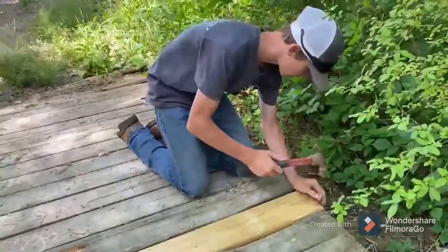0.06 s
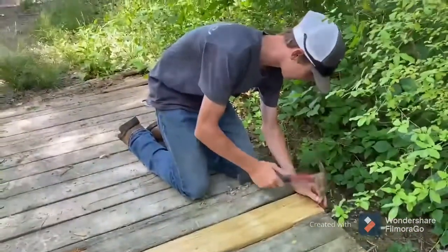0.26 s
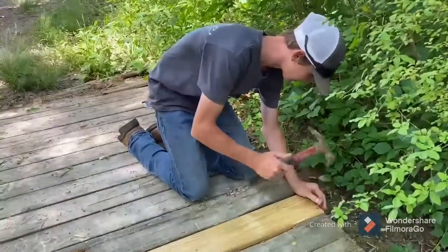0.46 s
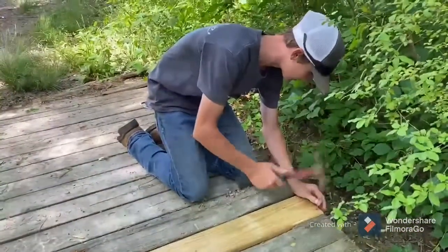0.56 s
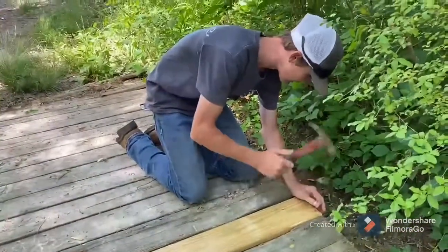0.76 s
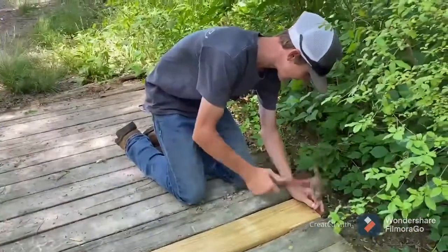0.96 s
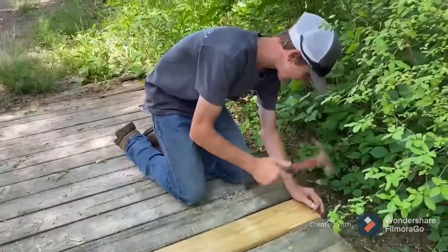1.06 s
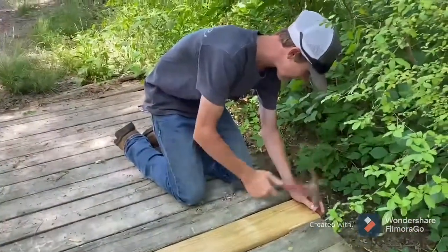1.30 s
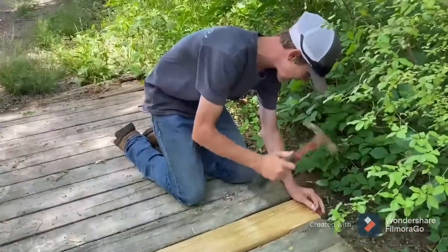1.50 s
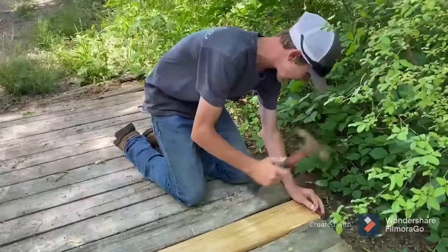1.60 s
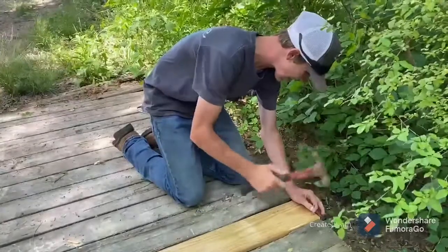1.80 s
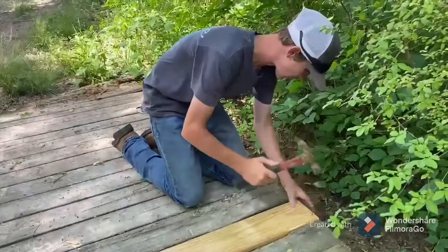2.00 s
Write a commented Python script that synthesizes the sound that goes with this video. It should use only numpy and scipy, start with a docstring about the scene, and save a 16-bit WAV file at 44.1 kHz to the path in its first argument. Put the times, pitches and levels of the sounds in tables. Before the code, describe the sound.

A hammer drives a nail into a loose wooden deck board: a duller, thumpier blow at 0.22 s, then sharp cracking blows at about 0.57, 0.92, 1.28 and 1.65 s. Around and after each, the board bounces on its joists with dull double knocks and low booms, fading by 2 s. Close outdoor stereo sound, slightly overloaded peaks, short scatter from planks and trees, faint leaf hiss and low gusty wind.

```python
"""Five sharp hammer blows on a nail in a loose deck board, with dull knocks around them, outdoors among trees.
Each blow is a noise crack plus hammer-head modes through the air, and a thump and board modes along the wood
as a bending wave (treble first, bass late). The knocks are the board bouncing on its joists: push, ring, tick, boom.
Decaying noise answers from planks and trees; filtered noise makes the low wind rumble and leaf hiss beneath."""
import sys
import numpy as np
from scipy import signal
from scipy.fft import rfft, irfft, next_fast_len
from scipy.io import wavfile
from scipy.ndimage import uniform_filter1d, map_coordinates

SR = 44100
rng = np.random.default_rng(int(sys.argv[2]) if len(sys.argv) > 2 else 0)


def persist_wave(psi):
    """Save psi, clipped to +-1, as 16-bit WAV."""
    counts = np.round(np.clip(psi, -1, 1) * 32767).astype(np.int16)
    wavfile.write(sys.argv[1], SR, np.atleast_2d(counts).T)


N = 90404
EVENT_SAMPLES = 2 ** 14
FREQ_HZ = np.fft.rfftfreq(EVENT_SAMPLES, 1 / SR)
TIME_S = np.arange(EVENT_SAMPLES) / SR

# Leaf hiss spectrum. Each row: frequency in Hz, relative level in dB per Hz.
LEAF_SPECTRUM = [(120, -33), (200, -1.5), (715, -2.5), (2000, -8.5), (4880, -17), (8000, -24),
                 (11000, -27.5), (14500, -34), (16500, -34.5)]
# Wind rumble spectrum. Each row: frequency in Hz, relative level in dB per Hz.
RUMBLE_SPECTRUM = [(20, -28.5), (46, -15.5), (64, -13), (92, -13), (300, -36), (390, -107), (660, -120)]
# Mean course of the rumble level. Each row: time in seconds, level in dB.
GUST_LEVELS = [(0, -31), (.2, -30.5), (.3, -19.5), (.45, -38), (.55, -28.5), (.7, -27.5), (.83, -28),
               (.9, -29.5), (1.05, -33), (1.2, -28.5), (1.35, -26.5), (1.45, -31.5), (1.6, -28),
               (1.75, -34), (1.9, -30), (2.05, -35.5)]
# Left-right likeness of the air noise. Each row: frequency in Hz, correlation from -1 to 1.
AIR_CORRELATION = [(60, 0.91), (180, 0.9), (550, 0.14), (1650, -0.16), (4970, 0.72), (15000, 0.051)]
# Decay of the answer from planks and trees. Each row: frequency in Hz, t60 in seconds.
ANSWER_DECAY = [(300, 0.38), (1000, 0.14), (3000, 0.07), (7000, 0.039), (15000, 0.043)]

# Board landing on its joists. Each row: time in seconds, knock in dB, tick in dB, boom in dB, boom pitch in Hz.
LANDINGS = [(.086, -39.5, -72, -41, 114), (0.274, -21, -28.5, -20.5, 122), (0.321, -26.5, -38, -18, 106.2),
            (.375, -35.5, -55, -21, 87.3), (0.6418, -13, -24.5, -17.5, 122),
            (0.698, -15.5, -32.5, -17.5, 111.7), (.747, -52, -42, -28, 107),
            (1.012, -14.5, -26.5, -23, 122.4), (1.082, -16.5, -36, -23, 126.4),
            (1.145, -25, -51, -17.5, 113.2), (1.191, -29, -62, -31, 118), (1.373, -15.5, -26, -26, 123),
            (1.445, -26, -65, -17.5, 120), (1.508, -25, -43, -16.5, 113.7), (1.59, -39, -59, -31.5, 119),
            (1.749, -18.5, -25.5, -22, 115), (1.826, -34.5, -58, -25.5, 113.4),
            (1.876, -26.5, -43.5, -23, 120), (1.927, -42, -60, -35, 115)]
# Landing push spectrum. Each row: frequency in Hz, relative level in dB per Hz.
PUSH_SPECTRUM = [(60, -31), (130, -38), (200, 7.5), (280, 11.5), (420, -2.5), (700, -22), (2000, -31),
                 (5000, -120)]
# Landing tick spectrum. Each row: frequency in Hz, relative level in dB per Hz.
TICK_SPECTRUM = [(200, -27), (400, 17), (1200, 10.5), (3000, -0.5), (5500, -16.5), (7000, -25),
                 (10000, -120)]
# Joist modes. Each row: nominal frequency in Hz, mean level in dB, t60 in seconds.
JOIST_MODES = [(215.8, -8, 0.19), (248.5, -3.5, 0.095), (334, -8, 0.084), (434.5, -9, 0.089),
               (772.5, -17, 0.15)]

# Hammer blows. Each row: time in seconds, thump in dB, bass in dB, ring in dB, contact hardness in Hz,
# crack in dB, crack brightness in dB per octave, steel in dB.
HAMMER_BLOWS = [(0.2211, -2.5, -7, -4.5, 476, -17, 4.5, -35.5),
                (0.5695, -7.5, -6.5, -4.5, 794, -4, 2, -24.5),
                (0.9239, -11.5, -10.5, -6.5, 1630, -8, 3, -30.5),
                (1.2796, -7.5, -15, -8.5, 1650, -5, 2, -53), (1.653, -8.5, -22.5, -9, 1610, -4.5, 2, -26)]
# Thump spectrum. Each row: frequency in Hz, relative level in dB per Hz.
THUMP_SPECTRUM = [(30, -33), (60, -51), (90, 2.5), (130, 11), (250, 0), (350, -2.5), (600, -3.5),
                  (1200, -21.5), (3000, -56.5), (9000, -120)]
# Crack spectrum before brightness. Each row: frequency in Hz, relative level in dB per Hz.
CRACK_SPECTRUM = [(150, -29), (400, 14), (1000, 10.5), (3000, 3.5), (6000, -6), (10000, -15),
                  (16000, -24.5)]
# Deck frame modes. Each row: frequency in Hz, mean level in dB, t60 in seconds.
FRAME_MODES = [(90, -37, 0.025), (121, -4.5, 0.21)]
# Board modes. Each row: frequency in Hz, mean level in dB, t60 in seconds.
BOARD_MODES = [(264, -7, 0.11), (345, -10, 0.06), (428, -7, 0.06), (480, -11, 0.1), (585, -3, 0.075),
               (676, -13, .1), (775, -3, .14), (930, -13, 0.08), (1012, -10, 0.04), (1240, -9, 0.04),
               (1450, -14, 0.035), (1884, -16, 0.05), (2090, -9, .03), (4110, -16, 0.03)]
# Hammer head modes. Each row: frequency in Hz, mean level in dB, t60 in seconds.
STEEL_MODES = [(5771, 0, .085), (5900, -8, .05)]

# Phase lead of the left at width 1. Each row: frequency in Hz, lead in radians.
LEFT_LEAD = [(270, 0.15), (380, 0.4), (550, -2), (1000, 0.8), (1500, 2.5), (1850, 1.42), (2200, -2.34),
             (2800, -1.6), (4500, -0.4), (6500, 1.75), (7500, -1.5), (10500, 1.5), (11500, -2),
             (14500, 0.5), (15500, 4.5)]
# Left over right at width 1. Each row: frequency in Hz, level difference in dB.
LEFT_TILT = [(270, 6), (380, 7.5), (520, -1), (1000, -6.5), (2200, 1.5), (4500, -3), (6500, 10.5),
             (7500, 0.5), (11000, 0.5)]
# Bands where the centre cancels. Each row: centre in Hz, half width in Hz, depth in dB.
CENTRE_DIPS = [(9015, 842, -18.5), (12860, 750, -24)]
# Bands where both sides hear alike. Each row: centre in Hz, half width in Hz, depth in dB.
SIDE_DIPS = [(6900, 450, -18), (15700, 230, -31)]

# Bending delay in seconds = spread / sqrt(Hz)
BLOW_SPREAD, LANDING_SPREAD = 0.106, 0.14
BURST_RISE_S, TICK_T60_S = 0.00051, 0.044
CRACK_T60_S, SNAP_T60_S, SNAP_HZ, SNAP_DB = 0.036, 0.016, 3560, 7
BOOM_PEAK_S = 0.022
JOIST_RING_DB, SECOND_TOUCH_DB = -4.5, -6
MODE_LEVEL_SD_DB = 2
LANDING_SD = 0.1  # log spread of push pitch and bending spread
LEAF_DB, ANSWER_DB = -45.5, -5
ANSWER_LOW_HZ, MONO_HZ = 800, 230
BLOW_WIDTH, LANDING_WIDTH = 0.77, 0.5  # share of lead and tilt
ROLL_OFF_HZ, TOP_HZ = 45, 16950
CLIP_LEVEL, CLIP_HARDNESS = 1, 4


def amp(db):
    """Gain from dB."""
    return 10 ** (np.asarray(db) / 20)


def unit(x):
    """Scale to rms 1."""
    return x / np.sqrt(np.mean(x ** 2) + 1e-20)


def peak(x):
    """Scale to peak 1."""
    return x / np.abs(x).max()


def along(points, hz):
    """Interpolate (Hz, value) points on a log-frequency axis."""
    point_hz, value = np.transpose(points)
    return np.interp(np.log(hz + 1), np.log(point_hz + 1), value)


def wobble(knots_per_s):
    """Smooth random curve."""
    knots = rng.standard_normal(int(N * knots_per_s / SR) + 4)
    return map_coordinates(knots, [np.arange(N) * knots_per_s / SR])


def filtered(x, response):
    """Filter by a complex response of frequency, zero-padded."""
    size = next_fast_len(x.shape[-1] + SR // 4)
    spectrum = rfft(x, size) * response(np.fft.rfftfreq(size, 1 / SR))
    return irfft(spectrum, size)[..., :x.shape[-1]]


def add(track, start_s, sound):
    """Mix in a sound at its start time."""
    track[round(start_s * SR):][:EVENT_SAMPLES] += sound


def ring(modes):
    """Sum of decaying sine modes, levels drawn anew."""
    out = np.zeros(EVENT_SAMPLES)
    for hz, db, t60_s in modes:
        level_db = db + MODE_LEVEL_SD_DB * rng.normal()
        out += amp(level_db - 60 * TIME_S / t60_s) * np.sin(2 * np.pi * hz * TIME_S)
    return out


def travel(spectrum, spread):
    """Bending wave in wood: delay falls as 1 / sqrt(Hz), so treble arrives first."""
    wave = irfft(spectrum * np.exp(-4j * np.pi * spread * np.sqrt(FREQ_HZ)), EVENT_SAMPLES)
    fade_in = np.clip(TIME_S / 0.0017, 0, 1) ** 2
    return wave * fade_in * (TIME_S < TIME_S[-1] * 0.75)


def burst(spectrum, t60_s, tilt_db=0):
    """Dying coloured noise; tilt in dB per octave about 2 kHz."""
    colour_db = along(spectrum, FREQ_HZ) + tilt_db * np.log2((FREQ_HZ + 1) / 2000)
    noise = irfft(rfft(rng.standard_normal(EVENT_SAMPLES)) * amp(colour_db), EVENT_SAMPLES)
    return unit(noise) * amp(-60 * TIME_S / t60_s) * (1 - np.exp(-TIME_S / BURST_RISE_S))


def rush(spectrum, patchy_db):
    """Partly correlated stereo noise of rms 1, with random gain patches in time and frequency."""
    z = signal.stft(rng.standard_normal((2, N)), nperseg=512)[2]
    patches = uniform_filter1d(rng.standard_normal(z.shape[1:]), 6, 0)  # across frequency
    patches = uniform_filter1d(patches, 14, 1)  # across time
    pair = signal.istft(z * amp(patchy_db * unit(patches)), nperseg=512)[1][:, :N]

    def mid_side_gain(hz):
        angle = np.arccos(np.clip(along(AIR_CORRELATION, hz), -1, 1)) / 2
        return amp(along(spectrum, hz)) * [np.cos(angle), np.sin(angle)]

    mid, side = filtered(pair, mid_side_gain)
    return unit(np.array([mid + side, mid - side]))


def air():
    """Leaf hiss and gusty wind rumble: patchy noise under slow level curves."""
    gust_s, gust_db = np.transpose(GUST_LEVELS)
    rumble_db = np.interp(np.arange(N) / SR, gust_s, gust_db) + 0.62 * wobble(11.8)
    leaf_db = LEAF_DB + 0.12 * wobble(4.6)
    leaves = amp(leaf_db) * rush(LEAF_SPECTRUM, patchy_db=-1.5)
    return leaves + amp(rumble_db) * rush(RUMBLE_SPECTRUM, patchy_db=4.5)


def scatter(x):
    """Planks and trees answer with noise whose decay depends on frequency, redrawn for each blow."""
    out = np.zeros((2, N))
    # each span opens 10 ms before its blow; the first opens at zero
    starts_s = [0] + [row[0] - 0.01 for row in HAMMER_BLOWS[1:]]
    edges = np.round(np.array(starts_s + [N / SR]) * SR)
    for start, end in zip(edges, edges[1:]):
        hz, t, z = signal.stft(rng.standard_normal((2, SR // 4)), SR, nperseg=256)
        low_cut = hz ** 3 / (hz ** 3 + ANSWER_LOW_HZ ** 3)
        decay = amp(-60 * t / along(ANSWER_DECAY, hz)[:, None])
        tail = signal.istft(z * decay * low_cut[:, None], SR, nperseg=256)[1]
        part = x * (np.arange(N) >= start) * (np.arange(N) < end)
        out += signal.fftconvolve(part[None], tail / np.linalg.norm(tail[0]), axes=1)[:, :N]
    return out


def boom(hz):
    """Deck frame swells and fades with gliding pitch; a lower neighbouring mode beats against it."""
    u = TIME_S / BOOM_PEAK_S
    glide = 1 + 0.04 * rng.normal() * u
    pitch_ratio, turn = rng.uniform(0.7, 0.85), rng.uniform(0, 2 * np.pi)
    phase = 2 * np.pi * hz * np.cumsum(glide) / SR
    swell = (u * np.exp(1 - u)) ** 2
    return swell * (np.sin(phase) + 0.28 * np.sin(pitch_ratio * phase + turn))


def touch():
    """Wood on wood: soft push and dull joist ring, pitch and spread drawn anew."""
    pitch, spread = np.exp(LANDING_SD * rng.normal(size=2))
    push = peak(travel(amp(along(PUSH_SPECTRUM, FREQ_HZ / pitch)), LANDING_SPREAD * spread))
    modes = []
    for hz, db, t60_s in JOIST_MODES:
        detune = np.exp(LANDING_SD / 2 * rng.normal() * (hz < 500))  # low modes only
        modes.append((hz * detune, db, t60_s))
    return push + amp(JOIST_RING_DB) * travel(rfft(ring(modes)), LANDING_SPREAD)


def bounces():
    """Board lands on its joists: two touches, the second weaker, with a tick and the boom."""
    out = np.zeros(N + 2 * EVENT_SAMPLES)
    for start_s, knock_db, tick_db, boom_db, boom_hz in LANDINGS:
        second_s = rng.uniform(0.00605, 0.0121)
        add(out, start_s, amp(knock_db) * touch())
        add(out, start_s + second_s, amp(knock_db + SECOND_TOUCH_DB) * touch())
        tick = amp(tick_db) * burst(TICK_SPECTRUM, TICK_T60_S)
        add(out, start_s, amp(boom_db) * boom(boom_hz) + tick)
    return out[:N]


def crack(tilt_db):
    """Steel on steel: two noise bursts crossed over at SNAP_HZ, the top dying first."""
    high = 1 / (1 + (SNAP_HZ / (FREQ_HZ + 1)) ** 4)
    snap = rfft(burst(CRACK_SPECTRUM, SNAP_T60_S, tilt_db))
    body = rfft(burst(CRACK_SPECTRUM, CRACK_T60_S, tilt_db))
    return irfft(snap * high * amp(SNAP_DB) + body * (1 - high), EVENT_SAMPLES)


def softened(x, hardness_hz):
    """Spectrum of a ring set off by a contact that is soft above hardness_hz."""
    return rfft(x) / (1 + 1j * FREQ_HZ / hardness_hz) ** 2


def hammer():
    """Crack and steel come through the air; thump and ring run along the board."""
    out = np.zeros(N + EVENT_SAMPLES)
    thump = peak(travel(amp(along(THUMP_SPECTRUM, FREQ_HZ)), BLOW_SPREAD))
    for start_s, thump_db, bass_db, ring_db, hardness_hz, crack_db, bright_db, steel_db in HAMMER_BLOWS:
        frame = amp(bass_db) * rfft(ring(FRAME_MODES))
        board = amp(ring_db) * softened(ring(BOARD_MODES), hardness_hz)
        wood = amp(thump_db) * thump + travel(frame + board, BLOW_SPREAD)
        steel = amp(crack_db) * crack(bright_db) + amp(steel_db) * ring(STEEL_MODES)
        add(out, start_s, steel - wood)  # wood has opposite polarity
    return out[:N]


def placed(x, width):
    """Stereo by frequency-dependent phase lead and level tilt; bass alike in both channels."""
    def response(hz):
        share = width * np.array([[0.5], [-0.5]]) * hz ** 6 / (hz ** 6 + MONO_HZ ** 6)
        return amp(share * along(LEFT_TILT, hz)) * np.exp(1j * share * along(LEFT_LEAD, hz))

    return filtered(x, response)


def scene():
    """Air, scattered answer, landings and blows."""
    blows, landings = hammer(), bounces()
    direct = placed(blows, BLOW_WIDTH) + placed(landings, LANDING_WIDTH)
    return direct + amp(ANSWER_DB) * scatter(blows + landings) + air()


def dips(bands):
    """Response with flat-bottomed notches."""
    return lambda hz: amp(sum(db * np.exp(-((hz - c) / w) ** 4) for c, w, db in bands))


def record(dry):
    """Centre and side notches, bass roll-off, soft clipping, band limit."""
    mid = filtered(dry[0] + dry[1], dips(CENTRE_DIPS)) / 2
    side = filtered(dry[0] - dry[1], dips(SIDE_DIPS)) / 2
    x = np.array([mid + side, mid - side])
    x = filtered(x, lambda hz: hz ** 3 / (hz ** 3 + ROLL_OFF_HZ ** 3))
    x = x / (1 + np.abs(x / CLIP_LEVEL) ** CLIP_HARDNESS) ** (1 / CLIP_HARDNESS)
    return filtered(x, lambda hz: hz < TOP_HZ)


dry = scene()
out = record(dry)
persist_wave(out)
```